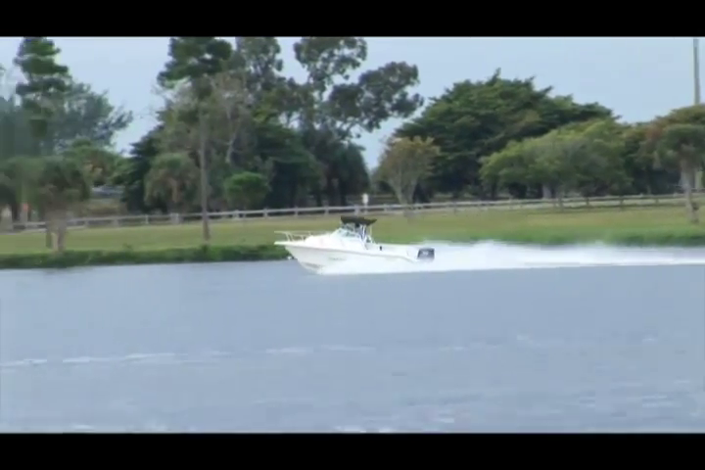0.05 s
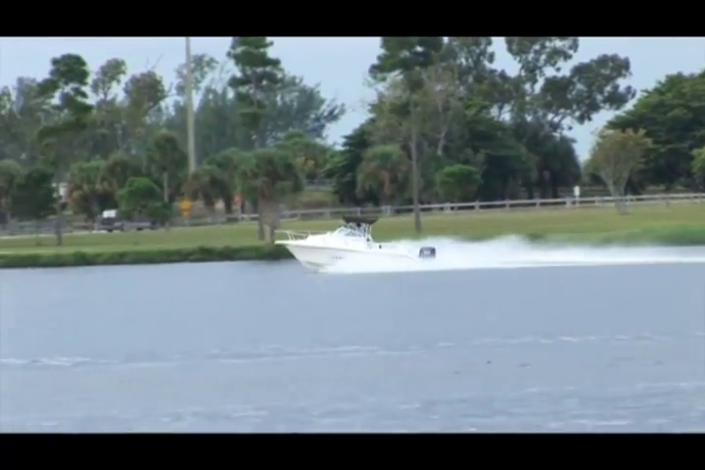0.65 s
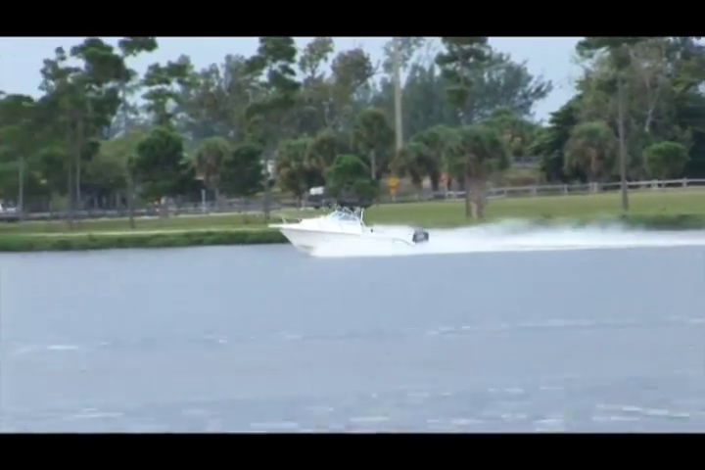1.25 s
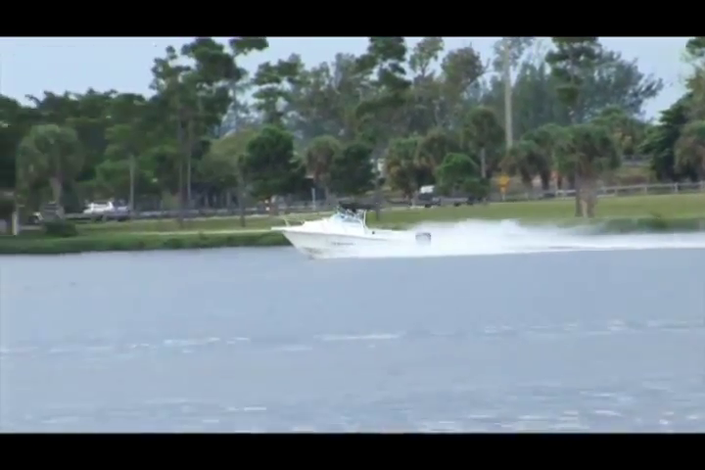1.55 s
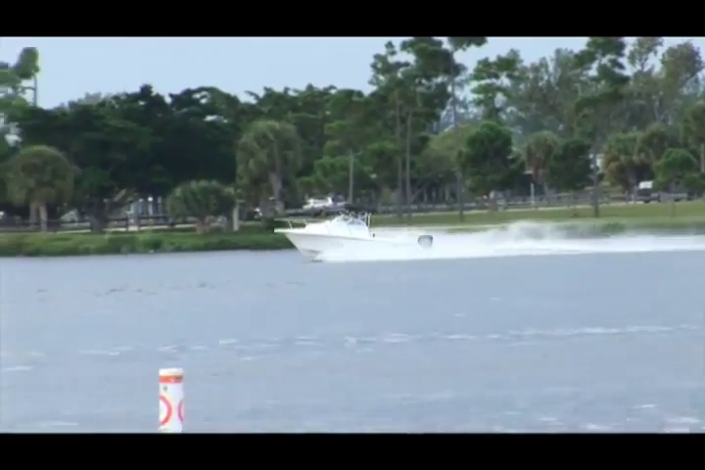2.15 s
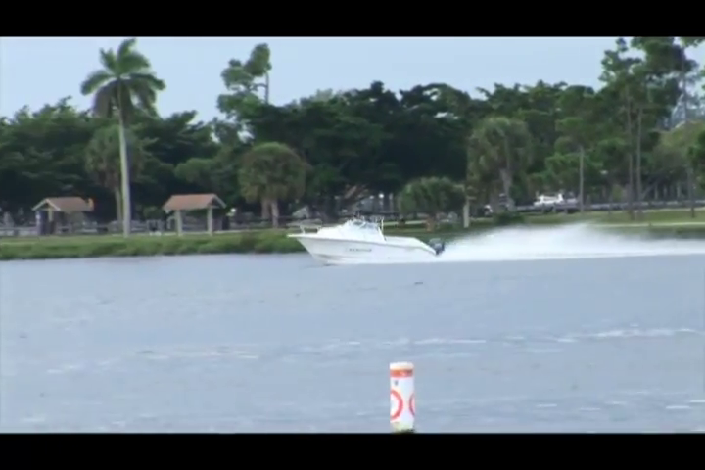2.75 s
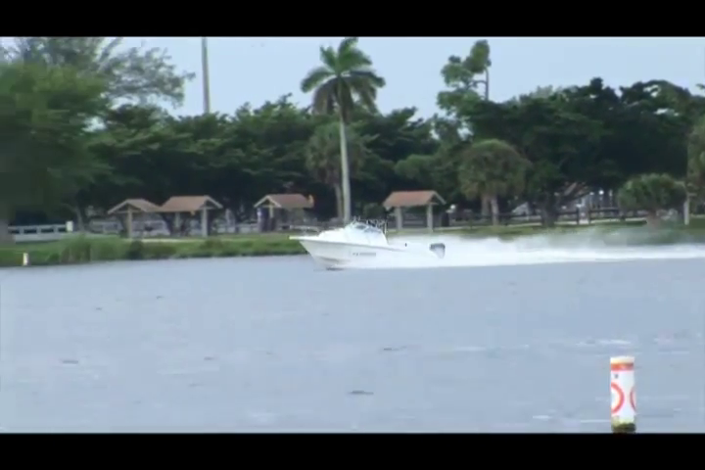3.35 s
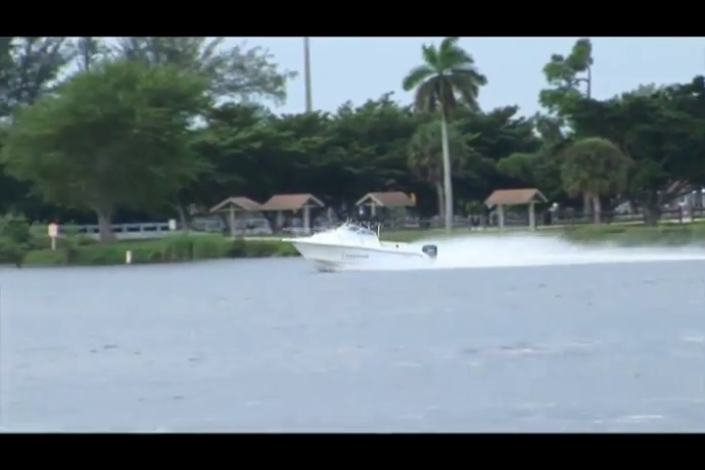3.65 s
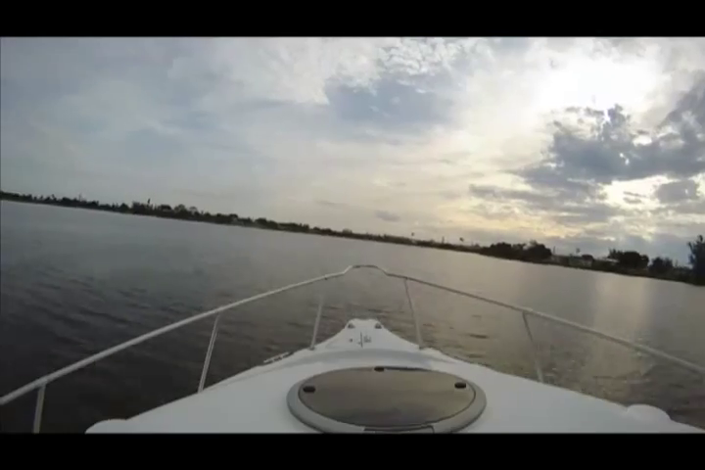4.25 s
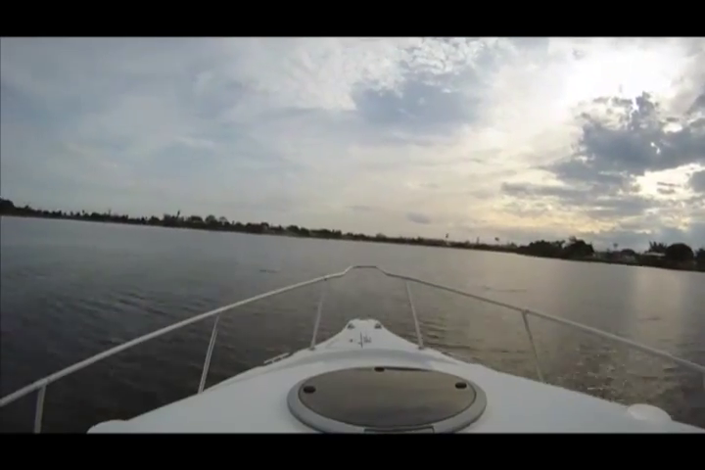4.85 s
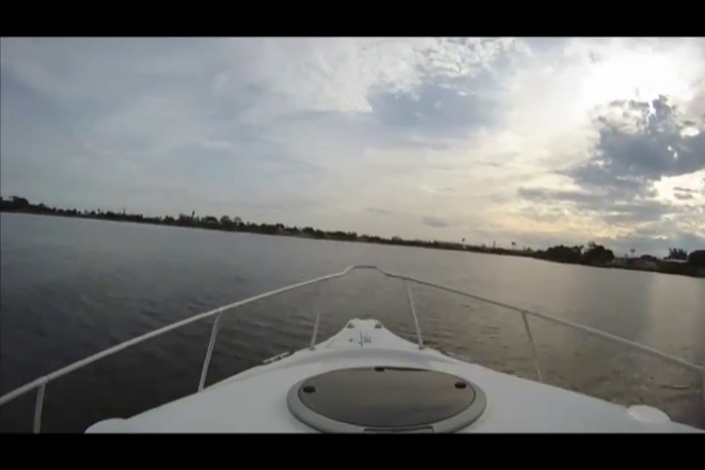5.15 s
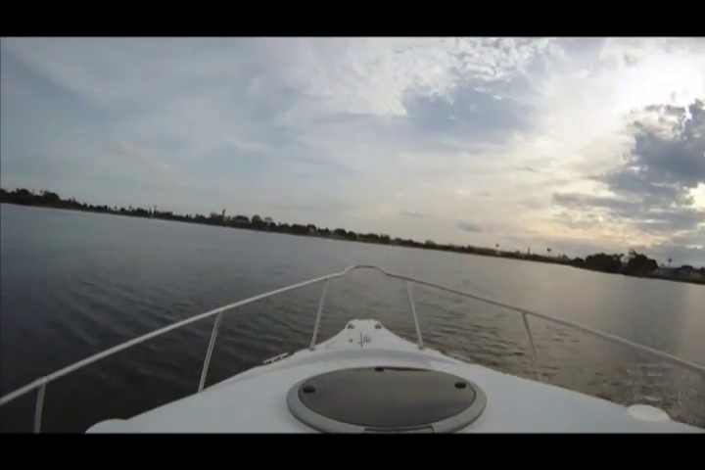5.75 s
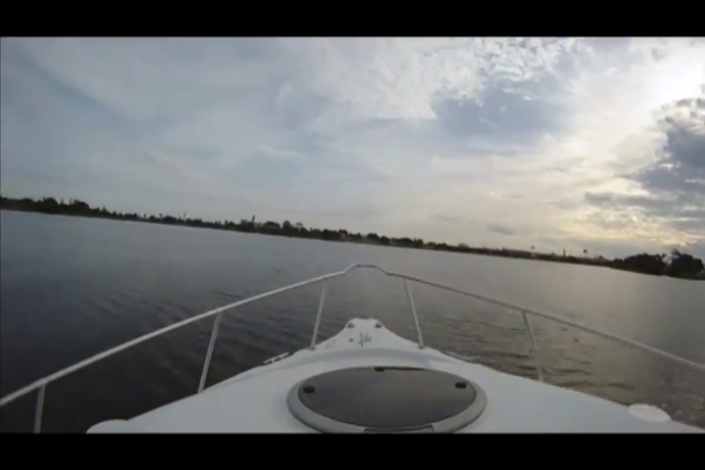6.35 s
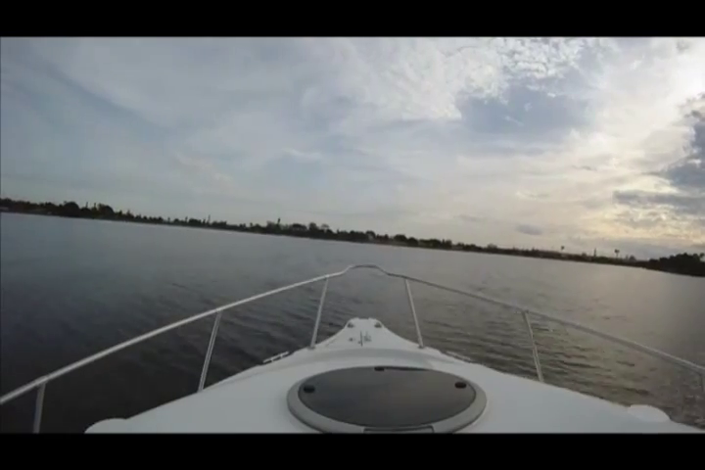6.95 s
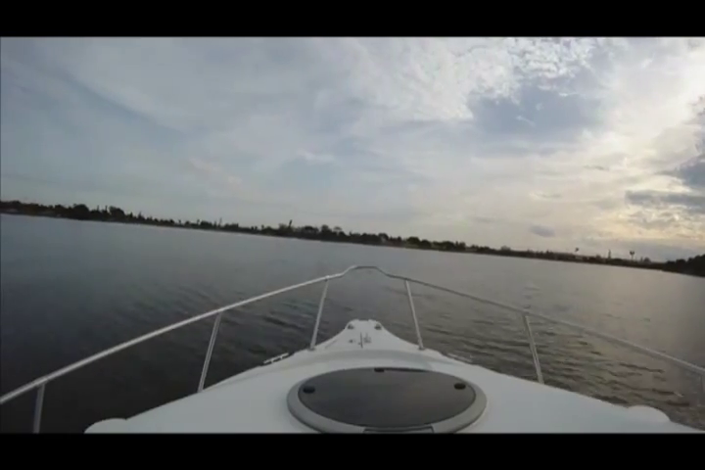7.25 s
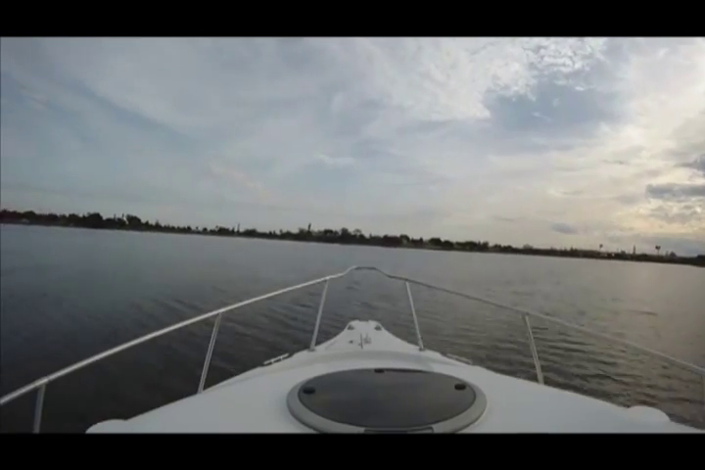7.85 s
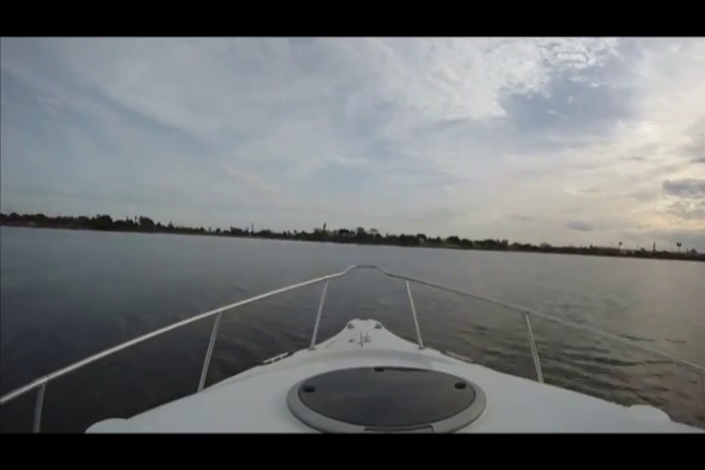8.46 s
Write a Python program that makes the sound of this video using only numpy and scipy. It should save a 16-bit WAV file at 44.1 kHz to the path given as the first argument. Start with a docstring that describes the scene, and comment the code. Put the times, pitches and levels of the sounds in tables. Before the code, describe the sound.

A motor boat drones far across a lake, two engine notes over a low rumble and the rush of its wake. Faint ripples and tiny ticks sound close by, with a few faint bird chirps. Before halfway the sound dissolves to a louder position on board, where deep wind buffets the microphone over the outboard's steady whine and the hiss of spray, edged with a thin sizzle.

```python
"""Motor boat on a lake, from afar and on board.

Far off, two engine notes drone over a low rumble and the rush of the wake; ripples and ticks sound
close by and birds chirp faintly on the shore. A dissolve takes us aboard the planing boat, where wind
buffets the microphone over the outboard's whine and the hiss of spray. The small camera there holds
each sample, which mirrors the sound into a thin sizzle."""
import sys
import numpy as np
from scipy import signal
from scipy.fft import rfft, irfft
from scipy.io import wavfile

SR = 44100
rng = np.random.default_rng(int(sys.argv[2]) if len(sys.argv) > 2 else 0)


def transcribe(signal):
    """Save signal, clipped to [-1, 1], as a 16-bit WAV file at the path in sys.argv[1]."""
    frames = np.atleast_2d(signal).T
    limited = np.clip(frames, -1, 1)
    pcm = np.round(limited * 32767).astype(np.int16)
    wavfile.write(sys.argv[1], SR, pcm)


N = 384552
TIME = np.arange(N) / SR
FREQS = np.fft.rfftfreq(N, 1 / SR)


def gain_of(db):
    """Decibels to amplitude."""
    return 10 ** (np.asarray(db) / 20)


def unit_rms(x):
    """Scales to an rms of one."""
    return x / np.sqrt(np.mean(x ** 2) + 1e-20)


def curves(rows):
    """Each value column of a (time [s], values...) table at every sample."""
    times, *columns = np.transpose(rows)
    return [np.interp(TIME, times, column) for column in columns]


def noise(spectrum):
    """Noise of rms one, coloured by (frequency [Hz], relative level [dB]) points."""
    hz, db = np.transpose(spectrum)
    colour = gain_of(np.interp(np.log(FREQS + 1), np.log(hz), db))
    return unit_rms(irfft(rfft(rng.standard_normal(N)) * colour, N))


def wander(rate_hz):
    """Smooth random drift of rms one, moving at up to about rate_hz."""
    hz = np.fft.rfftfreq(8192, 1 / 800)
    slow = irfft(rfft(rng.standard_normal(8192)) / (1 + (hz / rate_hz) ** 4))
    return unit_rms(np.interp(TIME, np.arange(8192) / 800, slow))


def burst(start, decay_s):
    """Envelope that jumps up at start and dies away."""
    age = np.maximum(TIME - start, 0) / decay_s
    return np.exp(-np.minimum(age, 20)) * (TIME >= start)


def plateaus(rows, edge_s=0.013):
    """Curve in dB that rises, holds and falls for each (time [s], length [s], height [dB])."""
    return sum(db * np.clip(np.minimum(TIME - start, start + length - TIME) / edge_s + .5, 0, 1)
               for start, length, db in rows)


# The boat's rumble, far across the water: (frequency [Hz], relative level [dB])
RUMBLE_SPECTRUM = [(15, -30), (38, -12), (60, -1), (80, 0), (97, -3), (130, 1), (200, -6), (270, -8),
                   (335, -10), (370, -17), (460, -19), (600, -23), (1000, -45), (3000, -90)]
def rumble(level_db=-28.5, fade_db_per_s=0.37, swell_db=0.14, throb_db=0.5):
    """The distant rumble swells and throbs at random as it slowly recedes."""
    receding_db = level_db - fade_db_per_s * TIME + swell_db * wander(9.1)
    return noise(RUMBLE_SPECTRUM) * gain_of(receding_db + throb_db * wander(26))


# The wake, far across the water: (frequency [Hz], relative level [dB])
WAKE_SPECTRUM = [(300, -13), (480, -3), (560, -2.5), (630, -2), (950, 3), (1250, 0.5), (1600, -6.5),
                 (2000, -8), (2500, -7.5), (3100, -12.5), (4000, -23.5), (5200, -30.5), (6800, -45),
                 (11500, -39.5), (15000, -43)]
def wake(level_db=-36.5, churn_db=0.66):
    """Water churns behind the boat in a steady rush."""
    return noise(WAKE_SPECTRUM) * gain_of(level_db + churn_db * wander(25))


def engine(shaft_hz, level_db, orders, jitter_turns, flutter, flutter_hz):
    """Tones at multiples of one jittering shaft speed; all flutter, the strong fifth only slightly."""
    turns = np.cumsum(shaft_hz) / SR + jitter_turns * wander(6.8)
    out = np.zeros(N)
    for order, db in orders:
        depth = flutter * (.15 if order == 5 else 1)
        angle = 2 * np.pi * (order * turns + rng.random())
        in_phase = (1 + depth * wander(flutter_hz)) * np.cos(angle)
        quadrature = depth * wander(flutter_hz) * np.sin(angle)
        out += gain_of(db) * (in_phase + quadrature)
    return np.sqrt(2) * gain_of(level_db) * out


# The outboard from afar: (time [s], shaft speed [Hz], level [dB])
FAR_OUTBOARD_RUN = [(0, 81.8, -36), (.4, 82.75, -33), (.8, 83.05, -32), (1.2, 83.2, -35.5),
                    (1.95, 83.6, -35.5), (2.75, 84.9, -32.5), (3.5, 85.5, -37)]
# Its tones at that distance: (order [x shaft speed], relative level [dB])
FAR_OUTBOARD_ORDERS = [(2, -11), (4, -15), (5, -0.5), (6, -17.5), (7, -26.5), (8, -29), (17, -38),
                       (20, -33), (21, -24), (25, -31.5)]
def far_outboard():
    """The outboard drones across the lake, slowly gaining speed."""
    shaft_hz, level_db = curves(FAR_OUTBOARD_RUN)
    return engine(shaft_hz, level_db, FAR_OUTBOARD_ORDERS,
                  jitter_turns=0.0065, flutter=0.32, flutter_hz=7.8)


# A second engine, also far off: (order [x shaft speed], relative level [dB])
SECOND_ENGINE_ORDERS = [(1, -1.5), (1.5, -4.5), (2, -9), (2.5, -12), (3, -2), (4, -12.5), (5, 1), (7, -13),
                        (9, -16.5), (19, -17.5), (27.5, -20.5)]
def second_engine(mean_hz=76.22, hunt_hz=.5, hunt_period_s=2.05, level_db=-39.8):
    """A slower engine hunts gently around its speed and beats against the outboard."""
    shaft_hz = mean_hz + hunt_hz * np.cos(2 * np.pi * TIME / hunt_period_s)
    return engine(shaft_hz, level_db, SECOND_ENGINE_ORDERS,
                  jitter_turns=0.0033, flutter=0.43, flutter_hz=7.3)


def lapping(drops_per_s=120, level_db=-68, spread_db=3):
    """Ripples break near the microphone: droplets of random size ring briefly at one of ten pitches."""
    age, out = np.arange(400) / SR, np.zeros(N)
    for hz in np.geomspace(3000, 6000, num=10):
        sizes = gain_of(spread_db * np.minimum(rng.exponential(1, N), 3))
        onsets = rng.random(N) < drops_per_s / 10 / SR
        ring = np.sin(2 * np.pi * hz * age) * age * np.exp(-age * hz / 3)
        out += signal.oaconvolve(sizes * onsets, ring)[:N]
    return gain_of(level_db) * unit_rms(out)


# Birds, faint from the shore: (time [s], level [dB])
SHORE_CHIRPS = [(.11, -58), (1.0, -57), (3.02, -58)]
def bird_chirps(top_hz=4500, fall_hz=700, length_s=.05):
    """Each chirp is a short whistle that swells and slides down."""
    out = np.zeros(N)
    for start, db in SHORE_CHIRPS:
        progress = np.clip((TIME - start) / length_s, 0, 1)
        turns = np.cumsum(top_hz - fall_hz * progress) / SR
        out += gain_of(db) * np.sin(np.pi * progress) * np.sin(2 * np.pi * turns)
    return out


# Small ticks close to the microphone: (time [s], relative level [dB], centre [Hz], decay [s])
CLOSE_TICKS = [(.445, -53, 12500, 0.011), (1.060, -36, 4300, 0.0061), (1.255, -53, 12000, 0.014),
               (1.398, -44, 5860, 0.0058), (1.435, -52, 12000, .008), (2.495, -53, 12500, 0.0032),
               (2.775, -55, 11520, .008), (2.995, -47, 5360, .007), (3.07, -56, 12500, .012),
               (3.352, -43, 11790, .012), (3.505, -51, 12000, .006)]
def ticks(trim_db=-8, ring_width=0.11, body_hz=3130, body_width=0.045, body_db=1):
    """Each tick is a noise burst in a broad resonance of its own, over a lower one that all share."""
    white, out = rfft(rng.standard_normal(N)), np.zeros(N)

    def resonance(hz, relative_width):
        return unit_rms(irfft(white / (1 + ((FREQS / hz - 1) / relative_width) ** 2), N))

    body = gain_of(body_db) * resonance(body_hz, body_width)
    for start, db, hz, decay_s in CLOSE_TICKS:
        out += gain_of(db + trim_db) * (resonance(hz, ring_width) + body) * burst(start, decay_s)
    return out


# On board, the air coming over the bow: (time [s], relative level [dB])
BOW_WIND = [(3.9, -7), (4.15, -4.5), (4.5, 1.3), (4.8, 0.5), (5.3, -0.1), (5.9, 0), (6.4, 2), (6.9, -0.6),
            (7.45, 0.9), (8.2, 0.1), (8.7, 0.3)]
# Gusts on top of it: (time [s], length [s], rise [dB])
BOW_GUSTS = [(4.813, .08, 3), (5.03, 0.066, 2.5), (6.082, 0.081, 1.5), (6.326, 0.072, 2.5), (6.49, .05, 2),
             (8.155, 0.023, 1.5), (8.278, 0.028, 1)]
# Brief ducks, where the camera's limiter turns the wind and spray down after a bump:
# (time [s], length [s], drop [dB])
LEVEL_DUCKS = [(5.093, 0.051, 5), (5.65, 0.034, 3), (5.869, .05, 4.5), (5.98, 0.087, 3.5),
               (6.741, 0.062, 5), (6.937, 0.12, 2.5), (7.659, 0.135, 3), (8.006, 0.051, 2),
               (8.105, .04, 2.5), (8.205, .06, 3.5), (8.325, 0.052, 5), (8.46, 0.051, 3)]
def airstream():
    """Level of the wind as heard on board, in dB: a slow swell with gusts, ducked at the listed times."""
    swell_db, = curves(BOW_WIND)
    return swell_db + plateaus(BOW_GUSTS) - plateaus(LEVEL_DUCKS)


# Wind right on the microphone: (frequency [Hz], relative level [dB])
BUFFET_SPECTRUM = [(10, -19), (25, 1), (55, 4.5), (110, 3.5), (170, 0), (230, -8.5), (400, -44)]
# Thumps, where a large eddy strikes it: (time [s], length [s], rise [dB])
EDDY_THUMPS = [(4.308, 0.045, 1), (4.547, 0.057, 1.5), (5.047, .05, 3), (5.394, 0.052, 2.5),
               (6.677, 0.077, 2.5), (7.626, .06, 2), (7.942, 0.056, 2), (8.06, 0.029, 2.5)]
def buffeting(air_db, eddies, lumps, level_db=-17.5, follow=0.59, eddy_db=1.2, lump_db=0.7):
    """The airstream beats on the microphone with a deep, thumping flutter."""
    turbulence_db = plateaus(EDDY_THUMPS) + eddy_db * eddies + lump_db * lumps
    return noise(BUFFET_SPECTRUM) * gain_of(level_db + follow * air_db + turbulence_db)


# The wind's roar on board: (frequency [Hz], relative level [dB])
ROAR_SPECTRUM = [(100, -17), (170, -6.5), (230, 0), (320, -3.5), (420, -7.5), (550, -10.5), (680, -17),
                 (820, -26.5), (1100, -35), (2000, -60)]
def roar(air_db, eddies, lumps, level_db=-22, follow=0.83, eddy_db=2.18, lump_db=0.48):
    """A roar pitched above the buffeting follows the wind's level, roughened by its eddies."""
    turbulence_db = eddy_db * eddies + lump_db * lumps
    return noise(ROAR_SPECTRUM) * gain_of(level_db + follow * air_db + turbulence_db)


# Spray, heard from inside the boat: (frequency [Hz], relative level [dB])
SPRAY_SPECTRUM = [(400, -12), (900, -3), (1150, 7.5), (1400, 4), (2020, 2), (2250, 8.5), (2600, 5),
                  (3000, 9), (3500, 0), (4300, -5), (5100, 1.5), (5500, -8), (5900, -12)]
def spray(air_db, eddies, level_db=-44, follow=1.18, eddy_db=0.7):
    """The hiss of spray rises and falls with the wind's level."""
    return noise(SPRAY_SPECTRUM) * gain_of(level_db + follow * air_db + eddy_db * eddies)


# The outboard from on board: (time [s], shaft speed [Hz], level [dB])
NEAR_OUTBOARD_RUN = [(3.9, 86.65, -32), (4.7, 87.22, -30.5), (5.5, 87.87, -29.5), (6.3, 87.78, -30.5),
                     (7.1, 87.84, -32), (7.9, 88.06, -31.5), (8.7, 89, -31)]
# Its tones at close range: (order [x shaft speed], relative level [dB])
NEAR_OUTBOARD_ORDERS = [(1, -9), (4, -15.5), (5, 1), (10, -34), (12, -24), (13, -31), (15, -42),
                        (16, -27.5), (18, -31), (19, -38), (20, -27), (21, -36), (25, -29.5), (27, -33),
                        (31, -34), (32, -35)]
def near_outboard():
    """The outboard whines through the wind, creeping up in speed."""
    shaft_hz, level_db = curves(NEAR_OUTBOARD_RUN)
    return engine(shaft_hz, level_db, NEAR_OUTBOARD_ORDERS,
                  jitter_turns=.002, flutter=0.33, flutter_hz=4.5)


def overload(x, ceiling=0.83):
    """Soft overload rounds off the hardest gusts."""
    return x / (1 + (x / ceiling) ** 6) ** (1 / 6)


def sample_and_hold(x, hold_hz=12000, band_hz=5550):
    """The camera holds each sample, mirroring its narrow band on both sides of the hold rate."""
    narrow = irfft(rfft(x) / np.sqrt(1 + (FREQS / band_hz) ** 50), N)
    mirrored = narrow * (1 + 2 * np.cos(2 * np.pi * hold_hz * TIME))
    notch = np.minimum(1, abs(FREQS - hold_hz) / (FREQS + 1))
    return irfft(rfft(mirrored) * notch, N)


# Sharp puffs right on the microphone: (time [s], relative level [dB])
WIND_PUFFS = [(6.607, -13), (7.234, -17), (7.283, -23), (7.854, -26), (8.172, -24), (8.285, -25)]
def puffs(trim_db=-11, decay_s=0.011):
    """Each puff of wind hits as a burst of midrange noise that dies at once."""
    blows = sum(gain_of(db + trim_db) * burst(start, decay_s) for start, db in WIND_PUFFS)
    return blows * noise([(200, -19), (600, 7), (1200, -2.5), (2500, -13), (5500, -34)])


# From the distant microphone to the one on board: (time [s], far gain [linear], near gain [linear])
FAR_TO_NEAR = [(3.57, 1, 0), (3.75, .7, .35), (3.95, .5, .95), (4.1, .3, 1), (4.4, 0, 1)]
def scene():
    """The distant boat dissolves into the ride, where one airstream drives buffeting, roar and spray."""
    afar = rumble() + wake() + far_outboard() + second_engine() + lapping() + bird_chirps() + ticks()
    air_db = airstream()
    eddies, lumps = wander(56), wander(7.7)  # fast and slow turbulence
    wind = buffeting(air_db, eddies, lumps) + roar(air_db, eddies, lumps)
    on_board = wind + spray(air_db, eddies) + near_outboard() + puffs()
    far_gain, near_gain = curves(FAR_TO_NEAR)
    return (far_gain * afar + near_gain * sample_and_hold(overload(on_board)))[None]


def record(dry, edge_hz=15330):
    """A steep low-pass cuts the highest treble at both microphone positions."""
    lowpass = signal.firwin(1023, edge_hz, window=("kaiser", 9), fs=SR)
    return signal.oaconvolve(dry, lowpass[None], "same")


dry = scene()
out = record(dry)
transcribe(out)
```